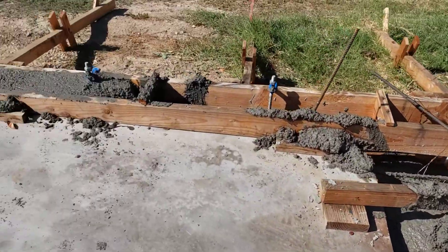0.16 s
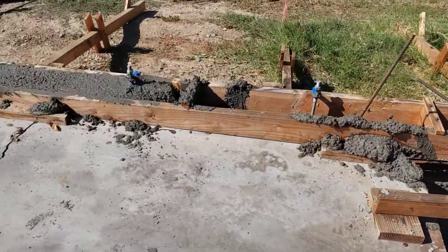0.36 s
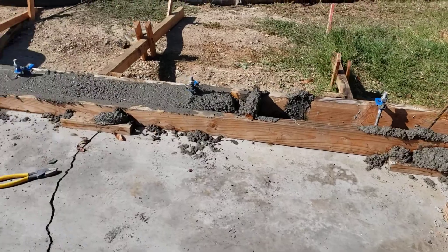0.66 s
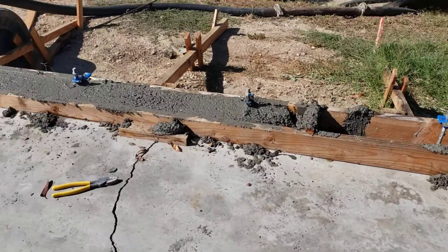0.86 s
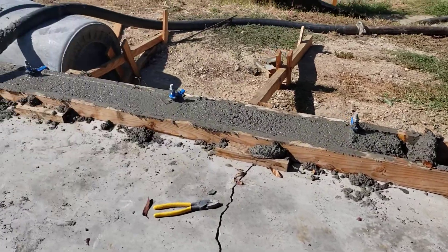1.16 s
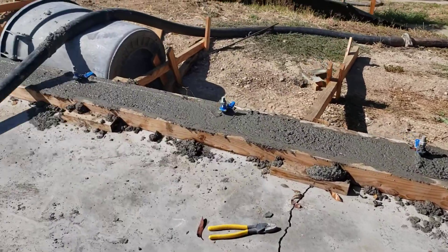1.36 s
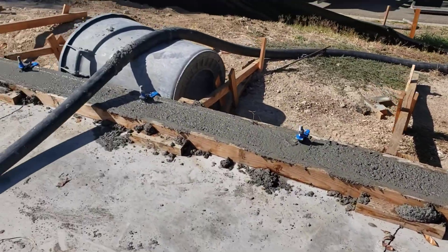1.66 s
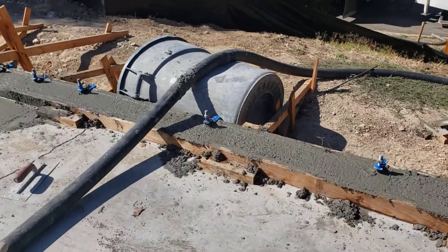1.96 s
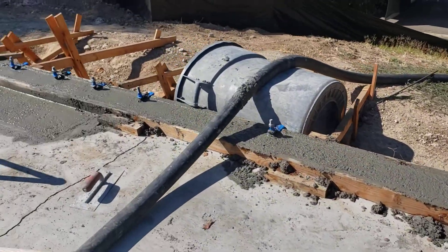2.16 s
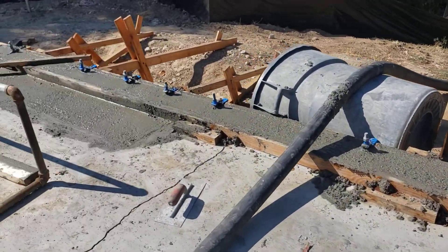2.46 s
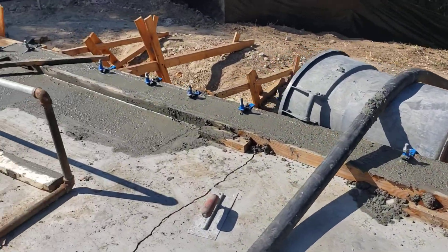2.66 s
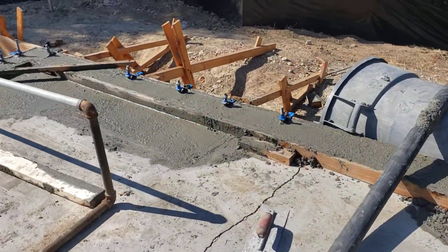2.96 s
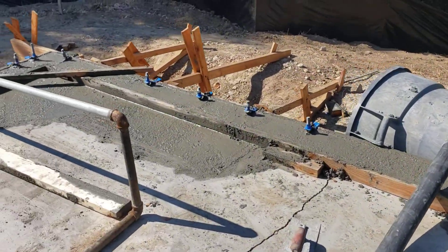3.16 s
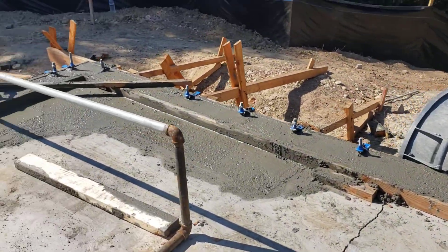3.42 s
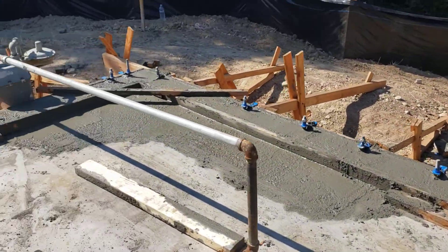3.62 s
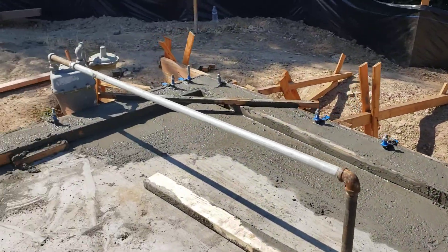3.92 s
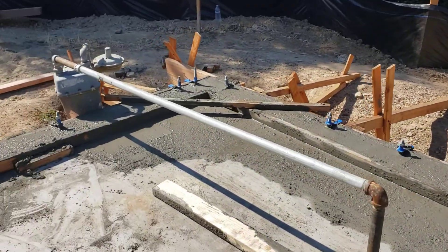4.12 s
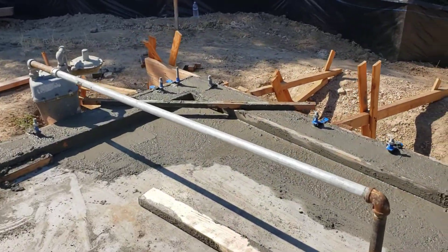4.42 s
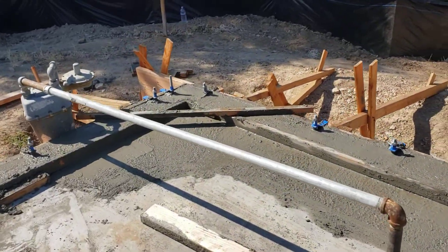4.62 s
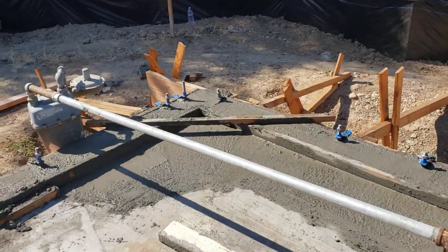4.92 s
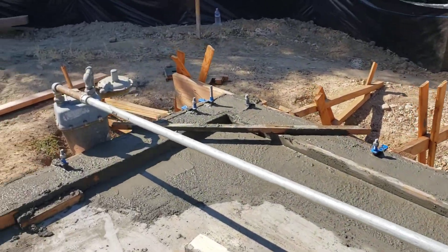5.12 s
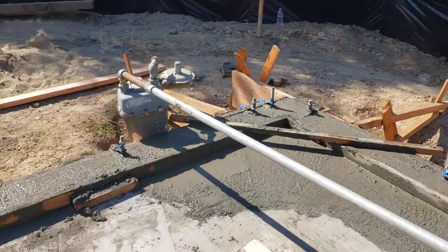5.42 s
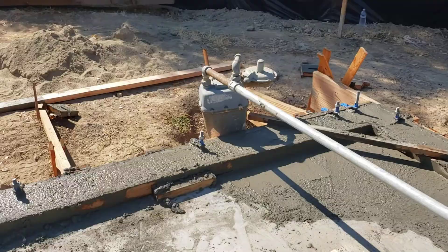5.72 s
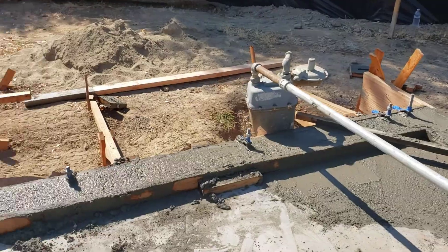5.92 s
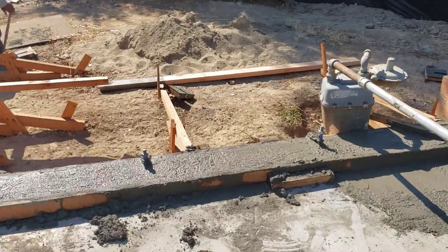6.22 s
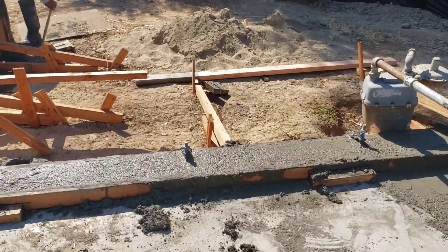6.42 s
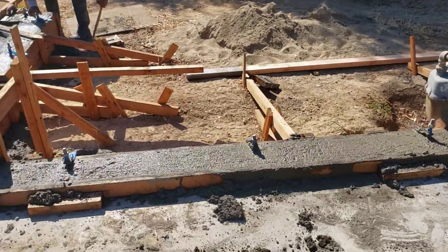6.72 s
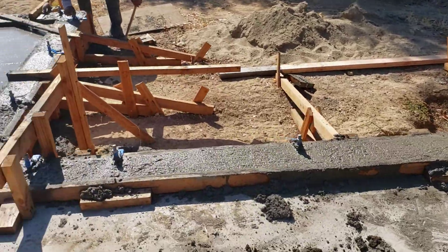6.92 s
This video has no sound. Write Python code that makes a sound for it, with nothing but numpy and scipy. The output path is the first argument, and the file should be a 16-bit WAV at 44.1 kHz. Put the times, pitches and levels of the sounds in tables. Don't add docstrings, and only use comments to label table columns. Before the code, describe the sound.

A diesel concrete pump labours close by outdoors, a deep buzzing drone around 70 hertz with knocking, rattling panels and hiss. About every second the engine leaps slightly higher, a valve thunks, and it sags back under load. A few steel tools clink, and a mixer truck hums and whines faintly further off. The hand-held stereo microphone turns slowly, moving the machines from ahead to the right.

```python
import sys
import numpy as np
from scipy import signal
from scipy.io import wavfile
from scipy.ndimage import map_coordinates

SR = 44100
rng = np.random.default_rng(int(sys.argv[2]) if len(sys.argv) > 2 else 0)


def decibels_to_gain(level_db):
    exponent = np.asarray(level_db, float) / 20
    return 10 ** exponent


def to_wav(s):
    ch = np.atleast_2d(s).T
    pcm = np.round(np.clip(ch, -1, 1) * 32767)
    wavfile.write(sys.argv[1], SR, pcm.astype(np.int16))


N = 312228
CONTROL_S = np.arange(0, N / SR + .002, .002)

# t/s the valve unloads the engine, leap of firing rate f/Hz
STROKES = [
    (-0.967, 5.0),
    (-0.002, 4.1),
    (0.981, 3.616),
    (1.976, 3.762),
    (2.967, 3.546),
    (3.953, 3.784),
    (4.945, 3.456),
    (5.936, 3.703),
    (6.969, 3.82),
]
LUGGING_HZ, FIRST_FIRING = 67.282, -.144
LEAP_S, OVERSHOOT_S, OVERSHOOT_SHARE, SAG_S = .219, .112, .266, .785
PEAK_S, EMPTY_S, REFILL_S, HANDOVER_S = 0.077, 0.3, 0.75, 0.085
FUEL_CUT_S, FUEL_BACK_S, FUEL_FULL_S = 0.21, 0.43, 0.64
DRAINED = [(.9,), (0.88,), (.9,), (0.62,), (0.83,), (1,), (0.7,), (0.67,), (.9,)]
# clatter level/dB, hiss level/dB, knock level/dB,
# hydraulic whine on the ninth order level/dB
EFFORT = [(-35, -41, -38, -50), (-35, -40, -32, -41.5), (-34.5, -38.5, -32.5, -40.5),
          (-35, -38, -32.5, -41.5), (-34.5, -39, -35, -47.5), (-33.5, -38.5, -37, -45.5),
          (-35, -38.5, -36, -45.5), (-35, -39, -37, -46), (-40, -37, -40, -50)]
SLACK_DB = (-4, -3.5, -8.5, -5.5)
CLATTER_FUEL_SHARE = 0.23

# t/s, level/dB
BOOM = [(0.0, -18.5), (0.04, -19.5), (0.51, -18), (1.58, -18.5), (1.91, -19.5), (2.33, -18.5),
        (3.04, -21.5), (3.25, -19.5), (3.65, -21.5), (4.83, -21.5), (4.95, -20), (5.19, -22.5),
        (6.01, -19.5), (6.19, -22.5), (7.04, -22), (7.08, -18.5)]
# running free level/dB, under load level/dB, phase of the free part/rad
OCTAVE = [(-30, -25, 0.52), (-34.5, -32.5, -1.4), (-39.5, -38.5, 0.71), (-33, -32.5, 0.52),
          (-33, -36.5, 0.71), (-36, -42, -0.21), (-30.5, -72, 1), (-31.5, -39, 0.44), (-33, -40, .8)]
LOADED_TURN, FREE_FADE_S = -1.6, .55
# multiple of firing rate, level/dB under the boom
LOW_ORDERS = [(0.25, -41), (0.5, -56), (0.75, -56), (1, 0), (1.25, -24), (1.5, -72), (1.75, -19.5),
              (2, -16), (2.25, -45), (2.5, -21.5), (2.75, -29.5), (3, -16), (3.25, -26), (3.5, -31.5),
              (3.75, -31.5), (4, -25), (4.25, -26.5), (4.5, -28.5), (4.75, -27), (5, -28.5), (5.25, -30),
              (5.5, -32), (5.75, -41), (6, -28)]
# multiple, level/dB ahead, level/dB turned, loss/dB while fuel is cut
FUELLED_ORDERS = [(1.75, -42, -46, -5), (2.5, -54, -46.5, 8), (4, -57, -48.5, 0), (4.5, -50.5, -49.5, 4),
                  (2.75, -53, -52.5, -7), (3, -46, -47.5, 9), (3.25, -52.5, -55, -8.5),
                  (7, -45.5, -55.5, -2.5), (12, -51.5, -45.5, 4), (13, -42, -55.5, 28),
                  (15.75, -44, -44, 17)]
# multiple of firing rate, level/dB
CASE_ORDERS = [(10.25, -49.5), (10.5, -54.5), (11, -57), (11.25, -50), (13.25, -53.5)]
CYLINDER_DB = [-2.5, 0.0, -2.5, -1.2]
# f/Hz, width/Hz, level/dB
BLOCK = [(1542, 63, 3), (1704, 67, 6), (2030, 520, 2.5), (2320, 220, -13), (2970, 320, -12.5)]
KNOCK_LATE, CLATTER_LATE, HISS_LATE = -.08, .12, .08

# f/Hz, level/dB per Hz
RUMBLE = [(25, -5), (60, 6.5), (110, 6), (200, -2), (350, -3.5), (480, -3), (650, 0), (850, -5.5),
          (1250, -4.5), (1500, -18)]
# f/Hz, level/dB per Hz
CLATTER = [(1100, -7), (1350, -5), (1650, 1.5), (2200, -1.5), (3000, -8), (4000, -10), (5500, -16.5),
           (7000, -26)]
# f/Hz, level/dB per Hz
HISS = [(5000, -6), (6500, -8), (7500, 2.5), (9500, -4.5), (12000, 6), (14000, -3), (15500, -6.5),
        (17500, -11)]
RUMBLE_REPEAT = .15
RUMBLE_DB, RUMBLE_PRESSURE_DB = -39.5, 2
# t/s, rumble lift/dB, hiss lift/dB
JOLTS = [
    (0.0, 12, 1),
    (0.22, 5.5, -3),
    (0.89, -4, 4),
    (3.04, 2, 1),
    (3.23, 1, 3),
    (4.18, -4, 3),
    (6.02, 1.5, 1),
]
JOLT_S = .012
# f/Hz, width/Hz, level/dB ahead, level/dB turned
GROUND = [(400, 150, -2.5, 3.5), (616, 140, 3.5, -1), (915, 120, 0, 8)]
# f/Hz, width/Hz, level/dB ahead, level/dB turned
PANELS = [(1170, 310, 1, -1.5), (1576, 90, 3.5, 5), (1980, 96, -0.5, 4.5), (2420, 90, 3, 2),
          (2864, 98, 2, 4.5), (4080, 140, 1.5, 2)]

# t/s, slam level/dB, level/dB of the hopper's dull ring a moment later
VALVE = [
    (.05, -30.5, -37),
    (1.07, -46, -39),
    (2.03, -24, -40),
    (3.04, -29, -44),
    (4.06, -35, -33),
    (5.04, -33, -38),
    (6.03, -28.5, -39),
]
# t/s, f/Hz, level/dB, t60/s
CLINKS = [(.873, 8371, -37, .12), (.873, 8694, -42, .15), (.873, 12520, -38, .15), (4.59, 2860, -39, .5),
          (4.64, 6778, -46, .7), (4.64, 8662, -45, .4), (4.64, 2600, -42, .4), (4.69, 4700, -43, .15),
          (4.69, 4301, -47, .6), (2.19, 1270, -35, .1), (2.032, 4500, -30, .04), (2.032, 2400, -31, .04),
          (2.046, 2400, -32, .04)]
TRUCK_HUM_HZ, TRUCK_HUM_DB = 79.8, -41.5
WHINE_HZ, WHINE_DB, WHINE_SWELL_S = 2450, -53, 0.044
# t/s, lift/dB
WHINE_SWELLS = [(0.3, 3.3), (1.28, 8), (1.65, 7), (3.02, 5), (3.43, 7.8), (4.22, 13), (4.65, 6.3),
                (6.6, 4.3)]

# t/s, delay/ms by which the left microphone hears later
BEARING = [(0.0, 0.034), (0.5, 0.046), (1.0, 0.13), (1.5, 0.25), (2.5, 0.34), (4.0, 0.43), (5.0, 0.39),
           (5.5, 0.47), (7.0, 0.45)]
# f/Hz, share alike
LIKENESS = [(150, .96), (600, .72), (1600, .67), (2500, .62), (3400, .5), (4500, .55), (5500, .45),
            (7000, .12), (15000, .07)]
# f/Hz, left over right/dB
TILT = [(60, 1), (110, 5), (200, 1.5), (380, 2), (700, 1), (1290, 1), (2380, 0), (4400, 1.5), (8120, 4),
        (15000, 7.5)]
PAN_AHEAD_DB, PAN_TURNED_DB = 6, 0
# f/Hz, width/Hz, level/dB
LEFT_PORT = [(1400, 340, -1.5), (1850, 870, -5.5), (2800, 160, 2), (13400, 1900, -7), (15800, 1300, 7)]
# f/Hz, width/Hz, level/dB
RIGHT_PORT = [(1400, 430, -0.5), (2760, 310, 0), (6400, 500, 3.5), (7350, 820, -12), (11700, 2000, 4.5),
              (15300, 1500, -2)]
CUTOFF_HZ = 15900


def firing_rate():
    rate = LUGGING_HZ
    for s, leap_hz in STROKES:
        rise = np.sin(np.pi / 2 * np.clip((CONTROL_S - s) / LEAP_S, 0, 1)) ** 2
        after = np.maximum(CONTROL_S - s - LEAP_S, 0)
        overshoot = OVERSHOOT_SHARE * np.exp(-(after / OVERSHOOT_S) ** 2)
        sag = (1 - OVERSHOOT_SHARE) * np.exp(-after / SAG_S)
        rate = rate + leap_hz * rise * (overshoot + sag)
    return in_time(np.transpose([CONTROL_S, rate]))[0]


def exhaust(firings, fuel, facing, ninth_db):
    def order(k):
        return np.sqrt(2) * np.cos(2 * np.pi * (round(4 * k) / 4 * firings + rng.random()))

    free = stroke_shape((PEAK_S, 0), (PEAK_S + HANDOVER_S, 1), (EMPTY_S, 1), (EMPTY_S + FREE_FADE_S, 0))
    free_db, loaded_db, free_turn = per_stroke(OCTAVE)
    boom = -decibels_to_gain(in_time(BOOM)[0]) * np.cos(2 * np.pi * firings)
    boom += free * decibels_to_gain(free_db) * np.cos(4 * np.pi * firings + free_turn)
    boom += (1 - free) * decibels_to_gain(loaded_db) * np.cos(4 * np.pi * firings + LOADED_TURN)
    out = np.sqrt(2) * boom + decibels_to_gain(ninth_db) * order(9)
    for k, db in LOW_ORDERS:
        if round(4 * k) not in (4, 7, 8, 10, 11, 12, 13, 16, 18):
            out += decibels_to_gain(db - 27.0 + 3.4 * drift(2.14)) * order(k)
    for k, ahead_db, turned_db, cut_db in FUELLED_ORDERS:
        db = ahead_db + (turned_db - ahead_db) * facing - cut_db * (1 - fuel)
        out += decibels_to_gain(db + 1.5 * drift(2.0)) * order(k)
    for k, db in CASE_ORDERS:
        out += decibels_to_gain(db + 2.5 * drift(1.2)) * order(k)
    return out


def knock(firings, spread_db, late):
    at = np.flatnonzero(np.diff(np.floor(firings - late)))
    cylinder = np.floor(firings[at + 1] - late).astype(int) % 4
    cylinder_db = np.array(CYLINDER_DB)[cylinder]
    out = np.zeros(N)
    for k, (hz, width_hz, db) in enumerate(BLOCK):
        blows = np.zeros(N)
        blow_db = cylinder_db + db + spread_db * rng.standard_normal(len(at))
        blows[at] = (-1) ** k * decibels_to_gain(blow_db)
        out += resonate(blows, hz, width_hz) / np.sqrt(width_hz)
    return rms_one(out)


def rumble(firings, facing, pressure, thud_db):
    out = machine_noise(RUMBLE, firings, facing, repeat=RUMBLE_REPEAT, patchy_db=0.18)
    out *= decibels_to_gain(RUMBLE_DB + RUMBLE_PRESSURE_DB * pressure + thud_db + 3.5)
    out *= firing_gate(firings, depth_db=1.0, late=.0)
    for hz, width_hz, ahead_db, turned_db in GROUND:
        out = colour(out, hz, width_hz, ahead_db + (turned_db - ahead_db) * facing ** 3)
    return out


def clatter(firings, facing, level_db):
    out = machine_noise(CLATTER, firings, facing, repeat=0.05, patchy_db=0.35) * decibels_to_gain(level_db + 2.5)
    out *= firing_gate(firings, depth_db=2.2, late=CLATTER_LATE)
    for hz, width_hz, ahead_db, turned_db in PANELS:
        out = colour(out, hz, width_hz, ahead_db + (turned_db - ahead_db) * facing)
    return out


def hiss(firings, facing, level_db):
    pan_db = PAN_AHEAD_DB + (PAN_TURNED_DB - PAN_AHEAD_DB) * facing
    out = machine_noise(HISS, firings, facing, repeat=.0, patchy_db=0.88) * decibels_to_gain(level_db + 2.5)
    out *= firing_gate(firings, depth_db=2.0, late=HISS_LATE)
    return out * decibels_to_gain((pan_db - 2.0) / 2 * np.array([[1], [-1], [1], [-1]]))


def machine_noise(spectrum, firings, facing, repeat, patchy_db):
    white = rng.standard_normal((2, 3, N))
    cycle = rng.standard_normal(4 * 630)
    looped = cycle[(firings * 630).astype(int) % len(cycle)]
    share = np.clip(repeat, 0, 1)
    white[:, 0] = np.sqrt(1 - share) * white[:, 0] + np.sqrt(share) * looped
    bottom, top = spectrum[0][0], spectrum[-1][0]
    edges = np.geomspace(bottom, top, round(3 * np.log2(top / bottom)) + 2)
    out, together = np.zeros((4, N)), drift(1.5)
    for k, (low, high) in enumerate(zip(edges, edges[1:])):
        band_filter = signal.butter(2, [low, high], "band", fs=SR, output="sos")
        bands = signal.sosfilt(band_filter, white[k % 2])
        hz = np.sqrt(low * high)
        alike = np.clip(at_hz(LIKENESS, hz), 0, 1)
        if hz > 2000:
            alike = alike * facing
        gain = decibels_to_gain(at_hz(spectrum, hz) + patchy_db * (.5 * together + drift(8.4)))
        sides = decibels_to_gain(at_hz(TILT, hz) / 2 * np.array([[1], [-1]]))
        out[:2] += gain * np.sqrt(alike) * bands[0] * sides
        out[2:] += gain * np.sqrt(1 - alike) * bands[1:] * sides
    return out / np.sqrt(np.mean(out ** 2) * 2)


def firing_gate(firings, depth_db, late):
    cylinder = np.floor(firings - late + .5).astype(int) % 4
    strength = decibels_to_gain(np.array(CYLINDER_DB)[cylinder])
    swell = (.5 + .5 * np.cos(2 * np.pi * (firings - late))) ** 3
    return rms_one(decibels_to_gain(depth_db * strength * swell))


def valve():
    slam, seat = np.zeros((2, N))
    for s, slam_db, seat_db in VALVE:
        slam[round(s * SR)] = decibels_to_gain(slam_db)
        seat[round((s + .08) * SR):round((s + .16) * SR)] = decibels_to_gain(seat_db)
    decay = decibels_to_gain(-60 / (.15 * SR))
    blow = signal.lfilter([1], [1, -decay], slam) * rng.standard_normal(N)
    steel = resonate(blow, 2100, 500) - 0.61 * resonate(blow, 2700, 500) + 0.53 * resonate(blow, 4540, 460)
    hopper = np.sin(2 * np.pi * 715 * np.arange(N) / SR + 1.3 * drift(17.0))
    return 3.6 * steel + resonate(seat * hopper, 706, 40)


def clinks():
    out, t = np.zeros(N), np.arange(SR // 2) / SR
    onset = np.minimum(t / 0.00074, 1)
    for s, hz, db, t60 in CLINKS:
        start = round(s * SR)
        out[start:start + len(t)] += decibels_to_gain(db - 60 * t / t60) * np.sin(2 * np.pi * hz * t) * onset
    return out


def truck(whine_db):
    t = np.arange(N) / SR
    hum = decibels_to_gain(TRUCK_HUM_DB + 0.78 * drift(1.4)) * np.sin(2 * np.pi * TRUCK_HUM_HZ * t)
    whine = np.sin(2 * np.pi * WHINE_HZ * t + 1.7 * drift(2.0))
    whine *= decibels_to_gain(whine_db + 0.5 + 2.0 * drift(6.0))
    return np.sqrt(2) * (hum + whine)


def stroke_shape(*points):
    return in_time([(s + after, value) for s, _ in STROKES for after, value in points])[0]


def per_stroke(rows):
    starts = [s + PEAK_S for s, _ in STROKES]
    ends = starts[1:] + [N / SR + 1]
    held = []
    for start, end, row in zip(starts, ends, rows):
        held += [(start + HANDOVER_S, *row), (end, *row)]
    return in_time(held)


def bumps(rows, width_s):
    lifts = sum(np.outer(row[1:], np.exp(-((CONTROL_S - row[0]) / width_s) ** 2)) for row in rows)
    return in_time(np.transpose([CONTROL_S, *lifts]))


def in_time(rows):
    s, *columns = np.transpose(rows)
    return [np.interp(np.arange(N) / SR, s, column) for column in columns]


def at_hz(points, hz):
    f, value = np.transpose(points)
    return np.interp(np.log(hz), np.log(f), value)


def drift(rate):
    r = np.exp(-80 * np.pi * rate / SR)
    chance = rng.standard_normal(N // 40 + 2002)
    slow = signal.lfilter([1], [1, -2 * r, r * r], chance)[2000:]
    return np.interp(np.arange(N) / 40, np.arange(len(slow)), rms_one(slow))


def rms_one(x):
    return x / np.sqrt(np.mean(x ** 2) + 1e-20)


def resonate(x, hz, width_hz):
    r = np.exp(-np.pi * width_hz / SR)
    drive = np.array([1, 0, -1]) * (1 - r * r) / 2
    return signal.lfilter(drive, [1, -2 * r * np.cos(2 * np.pi * hz / SR), r * r], x + 1e-18)


def colour(x, hz, width_hz, db):
    return x + (decibels_to_gain(db) - 1) * resonate(x, hz, width_hz)


def scene():
    pressure = stroke_shape((PEAK_S, 1), (EMPTY_S, 0), (REFILL_S, 0.1))
    pressure = 1 - (1 - pressure) * per_stroke(DRAINED)[0]
    fuel = stroke_shape((0.03, 0.85), (FUEL_CUT_S, 0), (FUEL_BACK_S, 0.7), (FUEL_FULL_S, 1))
    clatter_drive = pressure + CLATTER_FUEL_SHARE * (fuel - pressure)
    drives = clatter_drive, pressure, fuel ** 2, fuel
    levels = [db + slack * (1 - drive) for db, slack, drive in zip(per_stroke(EFFORT), SLACK_DB, drives)]
    clatter_db, hiss_db, knock_db, ninth_db = levels
    thud_db, puff_db = bumps(JOLTS, JOLT_S)
    whine_db = WHINE_DB + bumps(WHINE_SWELLS, WHINE_SWELL_S)[0]

    firings = FIRST_FIRING + np.cumsum(firing_rate()) / SR
    lag_ms, = in_time(BEARING)
    facing = np.clip(2.6 * lag_ms - .2, .15, 1)

    direct = exhaust(firings, fuel, facing, ninth_db) * decibels_to_gain([[.3], [-.3]])
    noise = rumble(firings, facing, pressure, thud_db)
    noise = noise + clatter(firings, facing, clatter_db) + hiss(firings, facing, hiss_db + puff_db)
    strikes = knock(firings, spread_db=1.5, late=KNOCK_LATE) * decibels_to_gain(knock_db - 1.5)
    direct += (strikes + valve() + truck(whine_db)) * decibels_to_gain([[-.8], [.8]])
    direct += noise[:2]
    heard_at = np.arange(N) - lag_ms * SR / 1000
    left = map_coordinates(direct[0], [heard_at], order=2, mode="nearest")
    return np.array([left, direct[1]]) + noise[2:] + clinks() * decibels_to_gain([[2.5], [-4.0]])


def band_limit(x):
    return signal.sosfilt(signal.butter(12, 17030, fs=SR, output="sos"), x)


def record(dry):
    left, right = dry
    for port in LEFT_PORT:
        left = colour(left, *port)
    for port in RIGHT_PORT:
        right = colour(right, *port)
    bass_cut = signal.butter(1, 25, "high", fs=SR, output="sos")
    top_cut = signal.ellip(14, .5, 80, CUTOFF_HZ, fs=SR, output="sos")
    mix = signal.sosfilt(top_cut, signal.sosfilt(bass_cut, [left, right]))
    return band_limit(mix)


dry = scene()
out = record(dry)
to_wav(out)
```